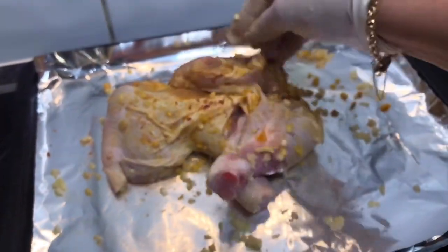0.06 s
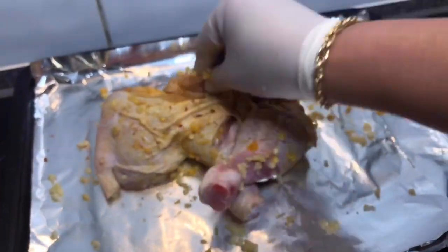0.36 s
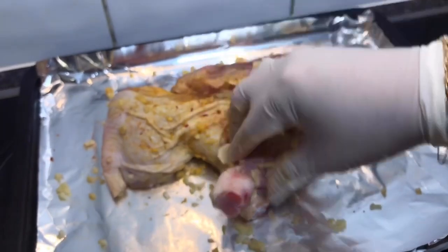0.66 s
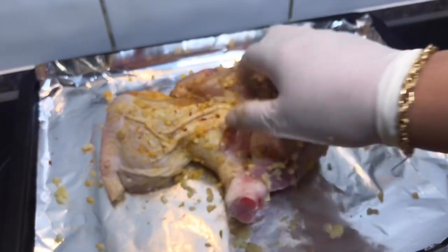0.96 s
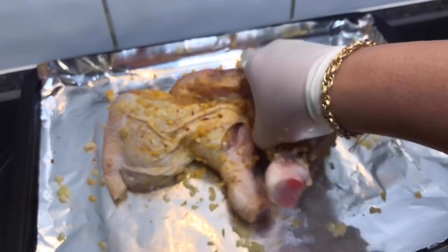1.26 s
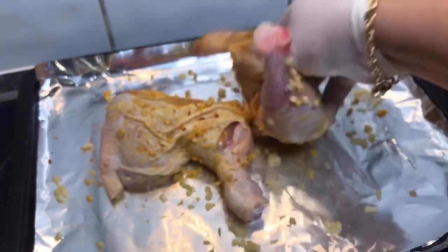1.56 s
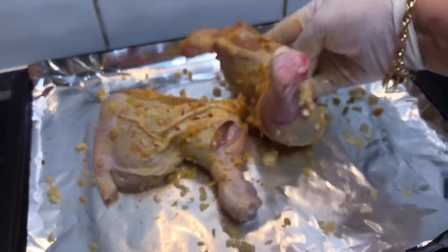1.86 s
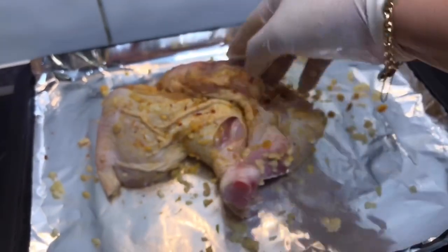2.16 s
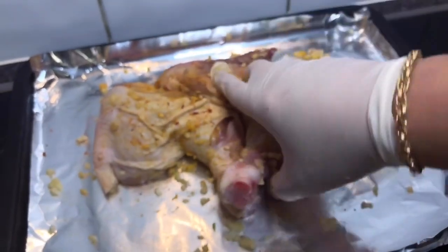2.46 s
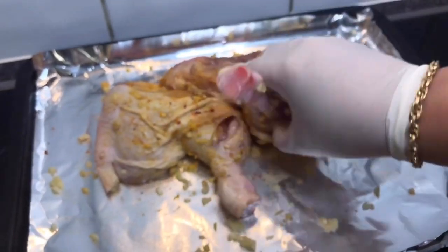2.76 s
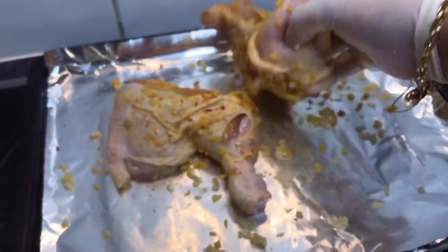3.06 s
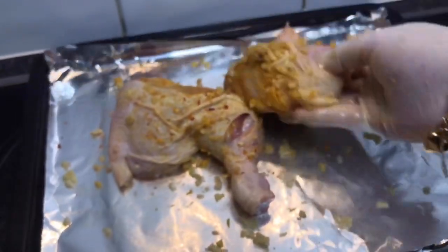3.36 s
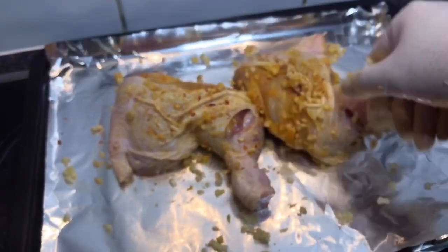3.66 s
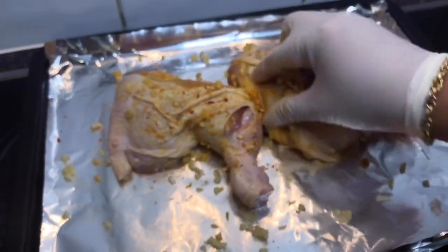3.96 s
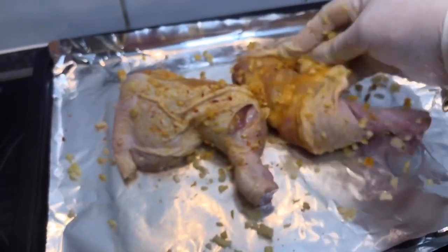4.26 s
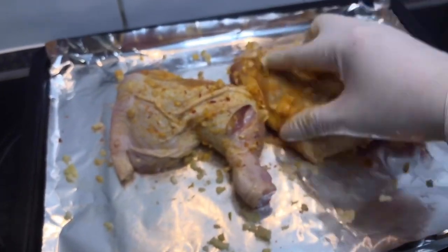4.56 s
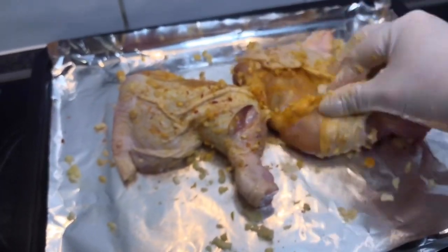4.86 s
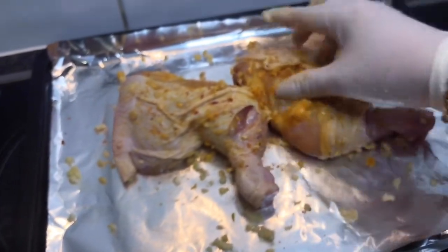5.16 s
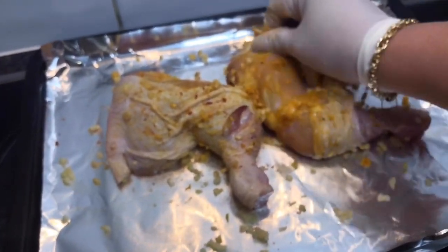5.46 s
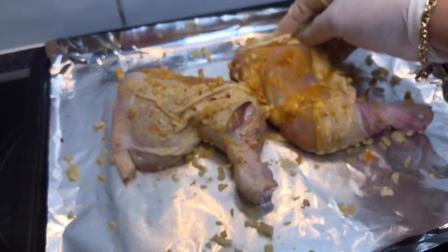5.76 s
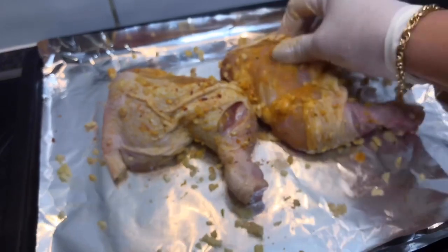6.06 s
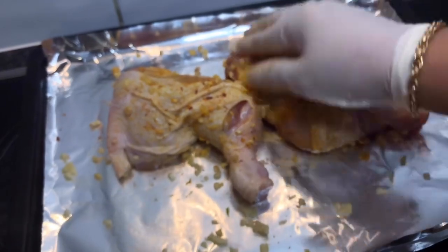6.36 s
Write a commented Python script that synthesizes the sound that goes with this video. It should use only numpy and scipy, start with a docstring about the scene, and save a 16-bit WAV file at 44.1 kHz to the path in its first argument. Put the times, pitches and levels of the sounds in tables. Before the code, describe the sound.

Close crackling of foil and sticky squelches of marinated chicken being moved, with dull thumps and light knocks from the tray.

```python
"""Foil snaps and crumples as a gloved hand turns marinated chicken on a lined baking tray.
Each crease buckles and briefly rings the sheet; wet skin smacks as tiny pockets tear open.
The glove rubs softly, the tray knocks against the stove, and the landing meat thumps its low modes.
A small kitchen adds reflections, rumble and a brief low drone.
A close microphone overloads on the loudest snaps."""
import sys
import numpy as np
from scipy import signal
from scipy.fft import rfft, irfft, next_fast_len
from scipy.io import wavfile

SR = 44100
rng = np.random.default_rng(int(sys.argv[2]) if len(sys.argv) > 2 else 0)


def generate_wav(signal):
    """Clip the signal to [-1, 1] and save it as 16-bit WAV at the path in sys.argv[1]."""
    frames = np.transpose(np.atleast_2d(signal))
    scaled = np.clip(frames, -1, 1) * 32767
    pcm = np.round(scaled).astype(np.int16)
    wavfile.write(sys.argv[1], SR, pcm)


N = 287091


def amp(db):
    """Amplitude ratio of a level in decibels."""
    return 10 ** (np.asarray(db) / 20)


def unit_rms(x):
    """Normalisation to unit mean power."""
    return x / np.sqrt(np.mean(x ** 2) + 1e-20)


def spectrum_at(points, hz):
    """Interpolation of a spectrum on a logarithmic frequency axis."""
    f, db = np.transpose(points)
    return np.interp(np.log(hz + 1), np.log(f), db)


def contour(points):
    """Amplitude envelope, linear in decibels between timed levels."""
    return amp(np.interp(np.arange(N) / SR, *np.transpose(points)))


def decay(t, t60):
    """Exponential damping: 60 dB are lost in t60 seconds."""
    return np.exp(-np.log(1000) * t / max(t60, 1e-3))


def noise(colour_db, size):
    """Spectral shaping: noise of unit rms, coloured by a function from Hz to dB."""
    hz = np.fft.rfftfreq(size, 1 / SR)
    return unit_rms(irfft(rfft(rng.standard_normal(size)) * amp(colour_db(hz)), size))


def add(mix, start, sound):
    """Superposition of a sound on the mix, from a start in seconds."""
    part = mix[max(round(start * SR), 0):][:len(sound)]
    part += sound[:len(part)]


def ripple(hz, depth_db, spacing_hz=420):
    """Irregular modal response: each patch of metal has its own peaks and dips, in dB."""
    knots = np.arange(200) * spacing_hz
    return depth_db * np.interp(hz, knots, rng.standard_normal(len(knots)))


def grains(per_s, spread_db, make_ring, count=24):
    """Shot noise: random impulses of uneven size each excite one of many small resonators."""
    at = np.flatnonzero(rng.random(N) < per_s / SR)
    size = amp(spread_db * np.minimum(rng.exponential(1, len(at)), 3.5))
    size *= rng.choice([-1, 1], len(at))
    which, out = rng.integers(0, count, len(at)), np.zeros(N)
    for k in range(count):
        clicks = np.bincount(at[which == k], size[which == k], N)
        out += signal.oaconvolve(clicks, unit_rms(make_ring()))[:N]
    return unit_rms(out)


# The kitchen's noise spectrum. Each row: frequency in Hz, relative density in dB.
ROOM_SPECTRUM = [(20, -32), (45, 1.5), (70, -3), (95, -2.5), (130, 4), (165, 0), (220, -8.5), (360, -5.5),
                 (480, -12), (1100, -13), (2500, -23), (6000, -54), (16000, -52)]
# Its rumble and hiss over time. Each row: time in seconds, level in dB.
ROOM_LEVELS = [(0, -46.5), (2.2, -47), (4.7, -48.5), (6.51, -49)]
# A faint low drone. Each row: time in seconds, level in dB.
DRONE_LEVELS = [(0, -53), (.4, -48), (.8, -51), (.95, -60)]


def background(drone_hz=70, waver_hz=3):
    """Broadband room noise, and a fading drone that wavers by random frequency modulation."""
    rumble = noise(lambda hz: spectrum_at(ROOM_SPECTRUM, hz), next_fast_len(N))[:N]
    waver = noise(lambda hz: -hz, next_fast_len(N))[:N]
    drone = np.sqrt(2) * np.sin(2 * np.pi * np.cumsum(drone_hz + waver_hz * waver) / SR)
    return contour(ROOM_LEVELS) * rumble + contour(DRONE_LEVELS) * drone


def buckle(colour, bright_db, t60, ripple_db, rise=0, crack=0.12, crack_t60=0.034):
    """Snap-through buckling: a crease flips, cracks and excites the dense modes of the sheet."""
    t = np.arange(4096) / SR
    treble = lambda hz: bright_db * np.interp(hz, [6000, 11000], [0, 1])
    ring = noise(lambda hz: spectrum_at(colour, hz) + ripple(hz, ripple_db) + treble(hz), len(t))
    attack = np.minimum((t + 1 / SR) / (rise + 1 / SR), 1)
    after = np.maximum(t - rise, 0)
    return ring * attack * (decay(after, t60) + crack * decay(after, crack_t60))


def wet_pocket(centre_hz, t60, q=5.5, splash_db=-17):
    """Cavity resonance: a tiny wet pocket tears open, and its broad peak colours the burst."""
    def colour_db(hz):
        resonance = 1 / (1 + (q * (hz / centre_hz - centre_hz / (hz + 1))) ** 2)
        splash = amp(splash_db + spectrum_at(CRACKLE_SPECTRUM, hz)) ** 2
        return 10 * np.log10(resonance + splash)

    t = np.arange(2048) / SR
    return noise(colour_db, len(t)) * decay(t, t60)


# How hard the hand works the foil. Each row: time in seconds, relative level in dB.
HAND_EFFORT = [(0, -38.5), (0.44, -46), (0.7, -46), (0.8, -37), (0.98, -50.5), (1.2, -45), (1.5, -44),
               (1.68, -31), (1.82, -43.5), (2.04, -33.5), (2.33, -56.5), (2.5, -60), (2.62, -49),
               (2.93, -47.5), (3.18, -37.5), (3.52, -34), (3.82, -40), (4.08, -36.5), (4.38, -42),
               (4.68, -51), (5.06, -42.5), (5.4, -54), (5.53, -40), (5.68, -48), (6.51, -45)]


def strain(snap_share_db=-16.5, yield_t60=0.055, settle_t60=0.22):
    """Strain in dB: the hand's work sums in power with yielding before and settling after each snap."""
    t, jolts = np.arange(-SR // 2, SR // 2) / SR, np.zeros(N)
    for start, db, _ in LOUD_SNAPS:
        add(jolts, start, [amp(db + snap_share_db) ** 2])
    around = np.where(t < 0, decay(abs(t), yield_t60), decay(abs(t), settle_t60))
    return 10 * np.log10(contour(HAND_EFFORT) ** 2 + signal.oaconvolve(jolts, around ** 2, "same"))


# The colour of fine crackle and splash. Each row: frequency in Hz, relative density in dB.
CRACKLE_SPECTRUM = [(150, -38), (500, -17), (1100, -8), (2000, -4), (3300, 1.5), (4800, 1), (7000, 1),
                    (10000, -4), (13000, -1), (16000, -4.5)]


def crackle(foil_db=-1, tick_db=-4, tick_strain_limit_db=-41, squelch_db=-9):
    """Acoustic emission: tiny creases, sticky ticks and squelch follow strain; the ticks level off."""
    crease = lambda: buckle(CRACKLE_SPECTRUM, 0, rng.uniform(0.007, 0.035), ripple_db=4.5, crack=0.13)
    tick = lambda: wet_pocket(2600 * 5 ** rng.random(), rng.uniform(0.0015, 0.023), q=3, splash_db=-7.5)
    squish = lambda: wet_pocket(1500 * 4 ** rng.random(), 0.016, q=2.2, splash_db=-17.5)
    foil = amp(foil_db) * grains(480, 4.2, crease, count=40)
    ticks = amp(tick_db) * grains(150, 8.6, tick, count=30)
    squelch = amp(squelch_db) * grains(900, 2.1, squish, count=16)
    strain_db = strain()
    return amp(strain_db) * (foil + squelch) + amp(np.minimum(strain_db, tick_strain_limit_db)) * ticks


# The tray's metal resonances. Each row: frequency in Hz, bandwidth in Hz, relative peak in dB.
TRAY_MODES = [(725, 520, -12), (1027, 180, -1), (1400, 260, -3), (1700, 230, -3), (2100, 160, -9),
              (2820, 360, -14.5), (3450, 1500, -13)]


def tray_response(hz):
    """Modal summation: the tray's resonance curves add in power, giving its response in dB."""
    power = sum(amp(db) ** 2 / (1 + (2 * (hz - f) / width) ** 2) for f, width, db in TRAY_MODES)
    return 10 * np.log10(power)


# The colour of ringing foil. Each row: frequency in Hz, relative density in dB.
FOIL_SPECTRUM = [(150, -26), (500, -24), (800, -36), (1400, -16.5), (2000, -10.5), (3000, -2.5),
                 (3550, 1.5), (4050, 0), (4650, 6), (5700, 3.5), (7000, 4.5), (10000, 2), (13000, 1.5),
                 (16000, 0.5)]
# The loudest creases. Each row: start in seconds, relative level in dB, treble lift in dB.
LOUD_SNAPS = [(0.0173, -19, 2), (0.032, -19, 2.5), (0.2674, -19.5, -8.5), (0.4074, -28.5, -7),
              (0.59, -27.5, 0.5), (0.644, -24.5, 0), (0.811, -20.5, -7.5), (1.134, -24, 5.5),
              (1.2038, -33, 2), (1.371, -29, -8), (1.394, -28, 0), (1.5967, -20.5, 1.5),
              (1.6582, -19.5, 3.5), (1.671, -18.5, 10), (1.7185, -26, 3), (1.7697, -29.5, 3),
              (1.895, -22.5, 3), (1.9794, -26.5, 0.5), (2.044, -25, 15), (2.068, -19.5, 3.5),
              (2.231, -35, 3), (2.271, -38, 0), (2.347, -28.5, 19), (2.525, -37.5, -12), (2.6501, -32, -3),
              (2.7148, -32.5, -4), (2.795, -28.5, -2), (2.97, -21.5, 5.5), (3.0395, -24, 1),
              (3.078, -27, 4), (3.1572, -26, 3), (3.194, -23, 7), (3.259, -29, 5), (3.331, -16, 7),
              (3.3719, -8, 2.5), (3.4566, -24.5, -1), (3.532, -21, 8), (3.799, -19, 5), (3.889, -14.5, 10),
              (3.899, -23, 14), (4.022, -20.5, -0.5), (4.0576, -22.5, -5), (4.0834, -21.5, -4),
              (4.134, -29.5, 0), (4.238, -18.5, -5), (4.405, -23.5, -0.5), (4.455, -11, -6),
              (4.5854, -31, 1), (4.985, -26.5, 3), (5.0287, -23, -6), (5.2638, -32.5, 3), (5.2811, -33, 4),
              (5.3114, -34.5, 0), (5.5342, -33, 0), (5.7866, -24, 8), (5.8195, -25, 8),
              (5.8501, -29.5, -0.5), (5.9893, -28, 1), (6.2283, -33, 5), (6.396, -32.5, 10)]


def snaps(level_db=2.5, usual_db=-24, usual_t60=0.034, doubling_db=35, tray_db=-24, tray_t60=0.034):
    """Free vibration after buckling: bigger creases ring longer, and each faintly excites the tray."""
    out, t = np.zeros(N), np.arange(8192) / SR
    for start, db, bright_db in LOUD_SNAPS:
        t60 = usual_t60 * 2 ** ((db - usual_db) / doubling_db)
        snap = buckle(FOIL_SPECTRUM, bright_db, t60, ripple_db=3.5, rise=0.001)
        add(out, start, amp(db + level_db) * snap)
        add(out, start, amp(db + tray_db) * noise(tray_response, len(t)) * decay(t, tray_t60))
    return out


def creases(level_db=7, spread_db=5, follow=0.93, usual_db=-44, count=100):
    """Release of elastic energy: middling creases flip at uneven moments, louder under more strain."""
    out, strain_db = np.zeros(N), strain()
    for k, (when, size, bright) in enumerate(rng.uniform(-1, 1, (count, 3))):
        at = int((k + (when + 1) / 2) * (N - 1) / count)
        db = usual_db + follow * (strain_db[at] - usual_db) + level_db + spread_db * size
        snap = buckle(FOIL_SPECTRUM, bright_db=2 + 6 * bright, t60=0.032, ripple_db=4.5, rise=0.00046)
        add(out, at / SR, amp(db) * snap)
    return out


# Wet pops. Each row: start in seconds, relative level in dB, centre in Hz, t60 in seconds.
WET_SMACKS = [(0.0496, -23, 4170, 0.026), (0.203, -28.5, 5240, 0.025), (0.360, -26.5, 3320, 0.015),
              (0.728, -38, 2800, 0.023), (0.768, -25, 2630, 0.05), (1.179, -32.5, 7160, 0.027),
              (1.477, -33, 2180, 0.063), (1.504, -25, 2780, 0.012), (2.347, -27, 3000, 0.018),
              (2.423, -40, 2920, 0.021), (3.9228, -21.5, 4700, 0.019), (3.98, -23, 7200, 0.022),
              (4.279, -28.5, 3080, 0.14), (4.967, -33, 3080, 0.035), (5.14, -35.5, 5200, 0.09),
              (5.158, -30, 4900, 0.04), (5.228, -30.5, 4140, 0.032), (5.4203, -28.5, 6300, 0.023),
              (5.52, -28.5, 3340, 0.019), (6.08, -34.5, 3550, 0.056), (6.219, -32.5, 3150, 0.017)]


def smacks(level_db=1):
    """Failure of adhesion: wet skin or glove comes unstuck with a single loud pop."""
    out = np.zeros(N)
    for start, db, hz, t60 in WET_SMACKS:
        add(out, start, amp(db + level_db) * wet_pocket(hz, t60))
    return out


# Patches of foil collapsing. Each row: start in seconds, relative level in dB, t60 in seconds.
COLLAPSES = [(0.156, -23, 0.048), (0.258, -38, 0.1), (0.405, -26.5, 0.037), (0.533, -29.5, 0.14),
             (0.807, -25.5, 0.061), (1.654, -34, 0.34), (1.98, -33.5, 0.2), (2.976, -31.5, 0.16),
             (3.329, -15.5, 0.14), (3.572, -17.5, 0.15), (3.707, -10.5, 0.059), (4.272, -26, 0.093),
             (4.448, -35, 0.028), (5.808, -29, 0.051), (6.0, -32.5, 0.052)]


def crumples(rise=0.0023, hold_share=0.14, tray_db=-20):
    """Buckling avalanches: meat presses or drags the foil into runs of snaps; the tray rings faintly."""
    t, force = np.arange(N) / SR, np.zeros(N)
    for start, db, t60 in COLLAPSES:
        attack = np.clip((t - start) / rise, 0, 1)
        after_hold = np.maximum(t - start - rise - hold_share * t60, 0)
        force += amp(db) * attack * decay(after_hold, t60)
    foil = grains(2500, 2.8, lambda: buckle(FOIL_SPECTRUM, bright_db=0.91, t60=0.024, ripple_db=0.5))
    tray = noise(tray_response, next_fast_len(N))[:N]
    return force * (foil + amp(tray_db) * tray)


# The glove sliding over skin. Each row: start in seconds, level in dB, length in seconds.
GLOVE_STROKES = [(0.284, -49.5, 0.24), (0.438, -49, 0.24), (1.281, -53.5, 0.4), (1.682, -53, 0.16)]


def rubs(centre_hz=680, fall_db=14):
    """Sliding friction: a dull band of noise swells and fades with each stroke."""
    out = np.zeros(N)
    for start, db, length in GLOVE_STROKES:
        swell = np.hanning(int(length * SR))
        friction = noise(lambda hz: -fall_db * np.log2((hz + 1) / centre_hz) ** 2, len(swell))
        add(out, start, amp(db) * swell * friction)
    return out


# The tray rocking on the stove. Each row: start in seconds, relative level in dB, t60 in seconds.
TRAY_KNOCKS = [(0.765, -17.5, 0.039), (2.347, -31, 0.026), (2.972, -32, 0.073), (3.335, -26.5, 0.13),
               (3.458, -29, 0.07), (3.711, -25.5, 0.2), (3.80, -26.5, 0.035), (4.587, -25.5, 0.021),
               (5.84, -21, 0.036), (5.927, -21.5, 0.023), (6.009, -17, 0.042), (6.335, -19.5, 0.054),
               (6.449, -29.5, 0.047)]


def knocks(level_db=-6, ripple_db=6, rise=0.001):
    """Impact excitation: each contact strikes another spot and weights the tray's modes differently."""
    out, t = np.zeros(N), np.arange(8192) / SR
    for start, db, t60 in TRAY_KNOCKS:
        ring = noise(lambda hz: tray_response(hz) + ripple(hz, ripple_db, spacing_hz=254), len(t))
        add(out, start, amp(db + level_db) * ring * decay(t, t60) * np.minimum(t / rise, 1))
    return out


# Low modes of the loaded tray. Each row: frequency in Hz, relative level in dB, t60 in seconds.
LOADED_MODES = [(64, -15, 0.26), (92.9, -10, 0.31), (117, -8.5, 0.14), (161, -1, 0.22), (196, -3.5, 0.036),
                (284.5, -5, 0.03), (346, -9.5, 0.064), (435, -12, 0.033)]
# The dull flop of meat settling. Each row: frequency in Hz, relative density in dB.
FLOP_SPECTRUM = [(25, -5), (50, 1), (220, 9), (450, -9), (800, -17), (3000, -62)]
# The meat landing. Each row: start in seconds, level in dB, hardness as a tilt in dB per octave.
LANDINGS = [(0.77, -23.5, -7.5), (1.976, -34, 14), (2.130, -22.5, -5.5), (2.972, -28.5, 44),
            (3.713, -11.5, 9.5), (3.723, -20.5, -7), (3.8, -24.5, 44), (5.048, -35.5, -4), (5.845, -30, -6),
            (6.014, -27.5, 3), (6.340, -28.5, -4.5)]


def thumps(rise=0.0071, flop_db=-13, flop_t60=0.077):
    """Soft impact: meat rings the low modes and flops to rest; harder contact favours the upper modes."""
    out, t = np.zeros(N), np.arange(SR // 2) / SR
    for start, db, hardness in LANDINGS:
        ring = np.zeros(len(t))
        for k, (hz, mode_db, t60) in enumerate(LOADED_MODES):
            tone = np.sin(2 * np.pi * hz * rng.uniform(0.99, 1.03) * t)
            ring += (-1) ** k * amp(mode_db + hardness * np.log2(hz)) * decay(t, t60) * tone
        tilt = lambda hz: hardness * np.log2(np.clip(hz, 60, 500))
        flop = noise(lambda hz: spectrum_at(FLOP_SPECTRUM, hz) + tilt(hz), len(t)) * decay(t, flop_t60)
        thump = ring / abs(ring).max() + amp(flop_db) * flop
        add(out, start, amp(db) * thump * np.minimum(t / rise, 1))
    return out


def room(x, early_db=-11, early_t60=0.11, late_db=-17, late_t60=0.36):
    """Reverberation: early reflections from tiled wall and stove, then the kitchen's duller tail."""
    t = np.arange(SR // 2) / SR
    onset = np.clip((t - 0.004) / 0.003, 0, 1)
    dull = lambda hz: spectrum_at([(200, 1.5), (5000, -6), (16000, -20)], hz)
    early = noise(np.zeros_like, len(t)) * decay(t, early_t60) * onset
    late = noise(dull, len(t)) * decay(t, late_t60) * onset
    response = (amp(early_db) * unit_rms(early) + amp(late_db) * unit_rms(late)) / np.sqrt(len(t))
    return signal.oaconvolve(x, response)[:N]


def scene(small_send=0.55, thump_send=0.94):
    """Direct and reverberant sound add; the small sounds stay close and drier."""
    metal = snaps() + creases() + crumples() + knocks()
    small = crackle() + smacks() + rubs()
    low = thumps()
    reflections = room(metal + small_send * small + thump_send * low)
    return (metal + small + low + reflections + background())[None]


def record(dry, low_cut_hz=27, high_cut_hz=16000):
    """Overload: the microphone sheds deep bass, clips the loudest snaps and limits the bandwidth."""
    highpass = signal.butter(2, low_cut_hz, "high", fs=SR, output="sos")
    clipped = np.clip(signal.sosfilt(highpass, dry), -1, 1)
    lowpass = signal.firwin(301, high_cut_hz, window=("kaiser", 8), fs=SR)
    return signal.oaconvolve(clipped, lowpass[None], "same")


dry = scene()
out = record(dry)
generate_wav(out)
```